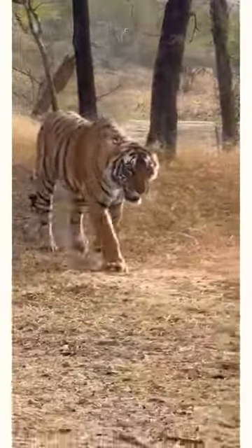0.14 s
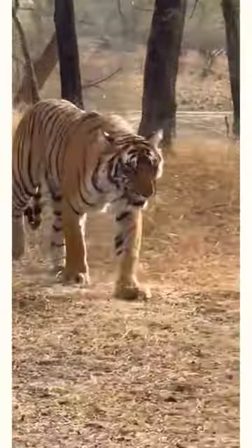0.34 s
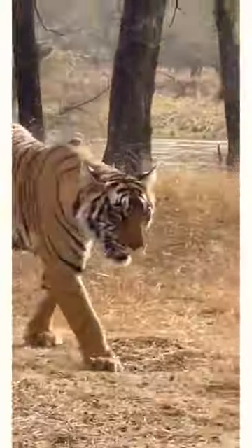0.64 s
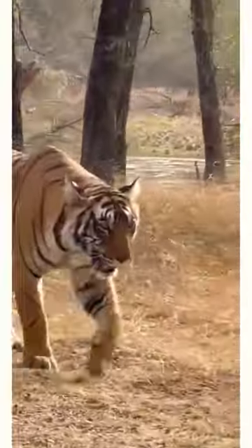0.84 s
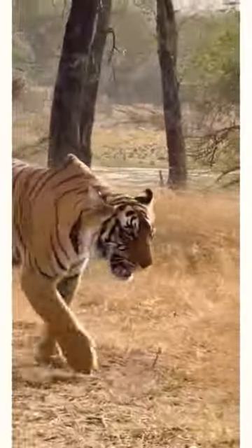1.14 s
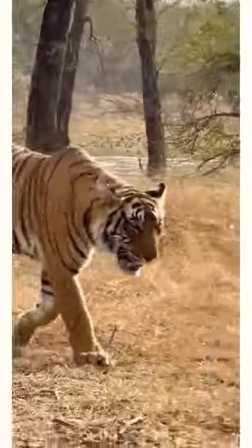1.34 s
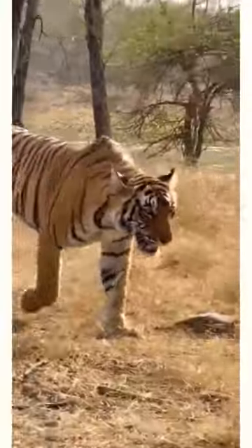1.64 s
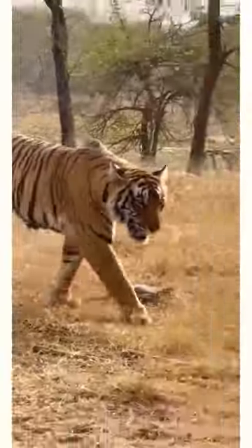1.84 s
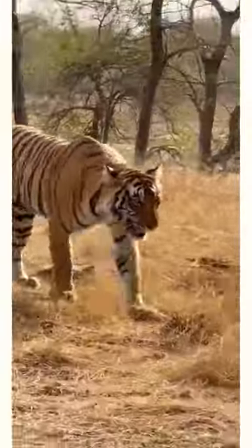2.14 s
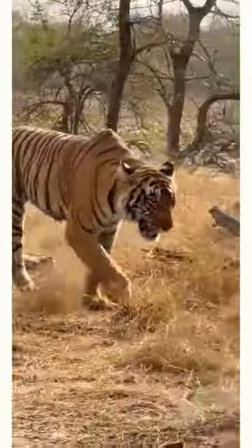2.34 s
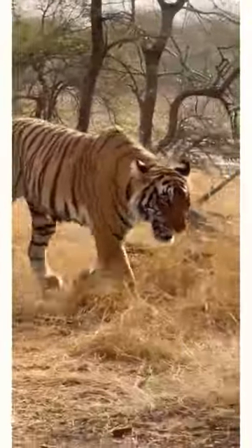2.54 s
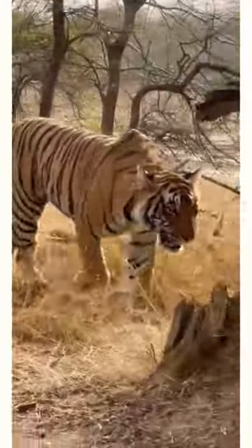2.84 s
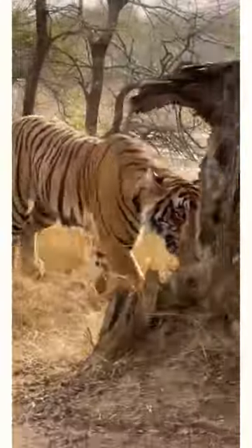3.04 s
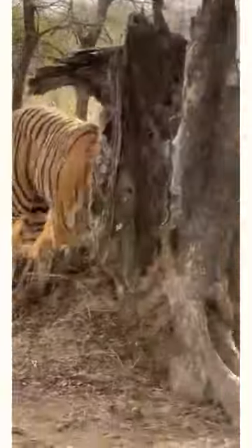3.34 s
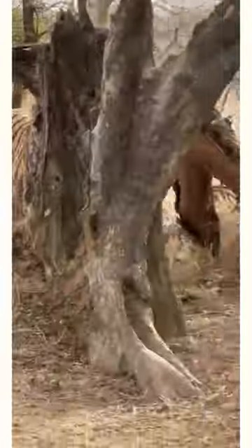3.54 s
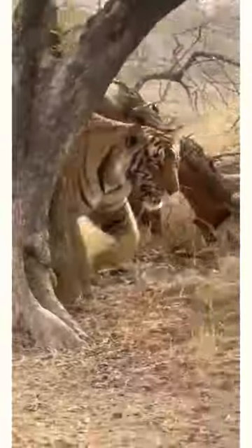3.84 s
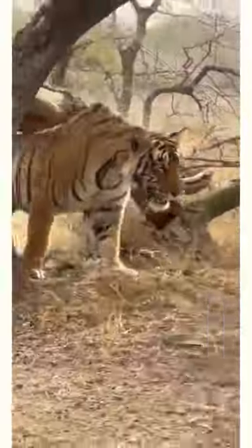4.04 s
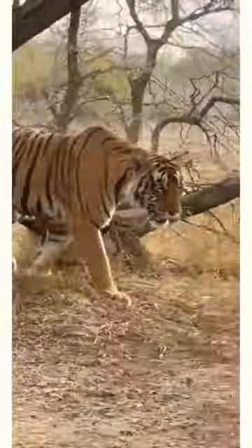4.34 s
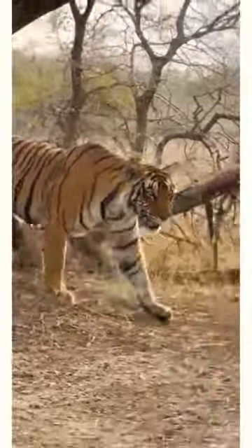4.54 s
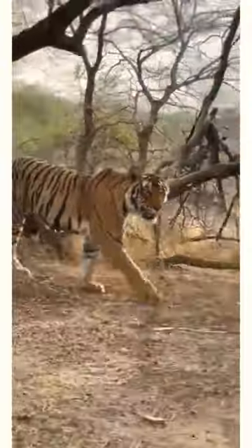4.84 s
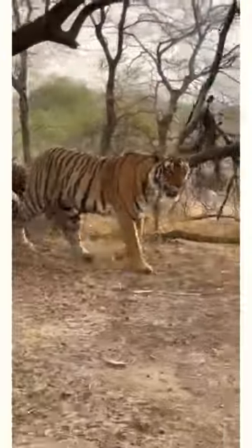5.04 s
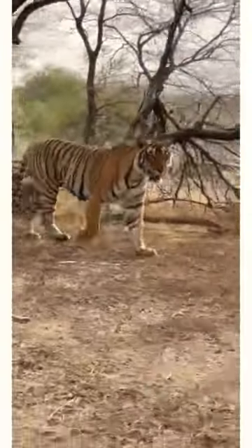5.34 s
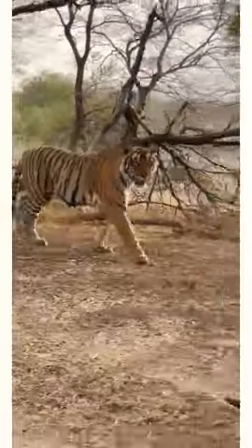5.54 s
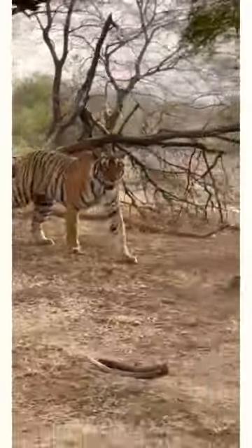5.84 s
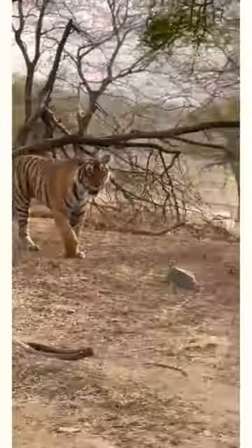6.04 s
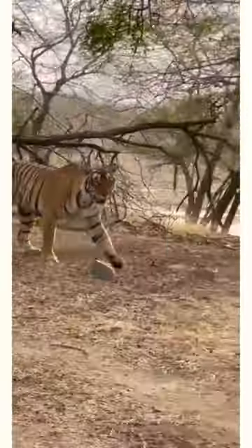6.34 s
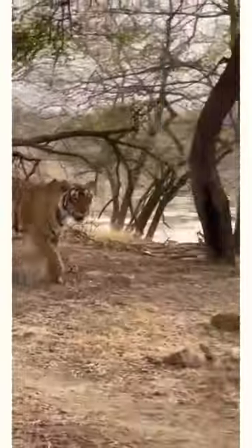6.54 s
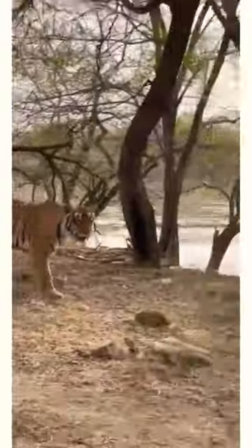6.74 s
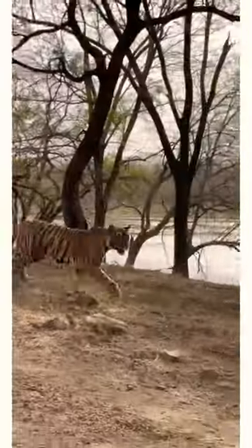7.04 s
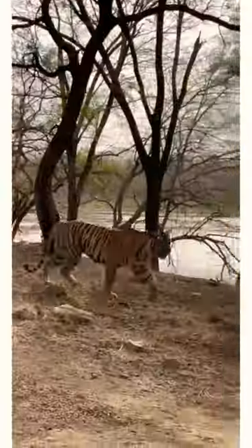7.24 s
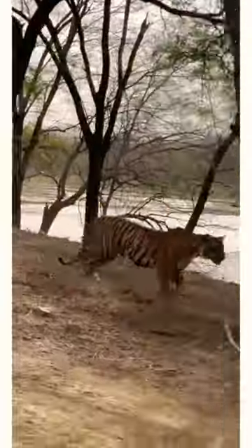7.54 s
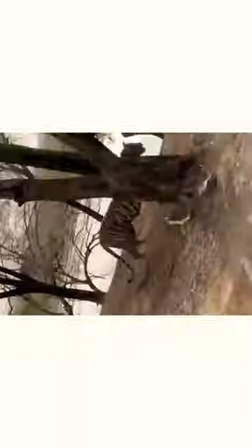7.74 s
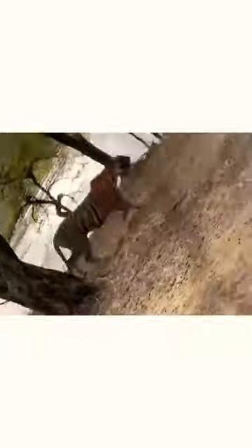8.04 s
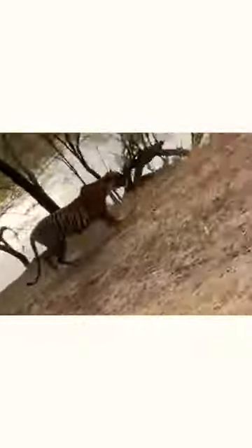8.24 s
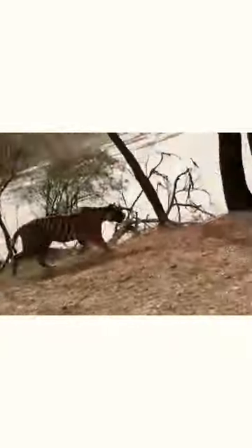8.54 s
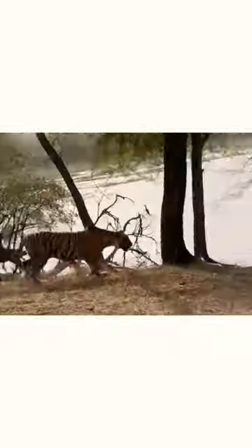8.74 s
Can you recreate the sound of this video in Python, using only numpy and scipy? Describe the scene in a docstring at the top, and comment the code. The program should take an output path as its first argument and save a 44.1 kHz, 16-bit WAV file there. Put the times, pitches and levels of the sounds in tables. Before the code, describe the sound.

Loud arching bird yelps with clipped whistles, then harsh honks over faint coos, two pure hoots, thin ticks and a fast trill in open woodland.

```python
"""Among trees by a lake, birds call loudly: arching yelps with clipped whistles between them,
then faint far coos under a run of harsh honks and two pure hoots, then thin ticks that break into
a fast trill over more yelps. Voices are buzzing harmonics with breath noise, or nearly pure gliding tones.
Trunks and ground throw the calls back as echoes and diffuse tails, and the loudest ones overload the
recorder. Shaped noise makes the outdoor air, in three stretches of differing colour with short gaps."""
import sys
import numpy as np
from scipy import signal
from scipy.fft import rfft, irfft
from scipy.io import wavfile
from scipy.ndimage import uniform_filter1d

SR = 44100
rng = np.random.default_rng(int(sys.argv[2]) if len(sys.argv) > 2 else 0)


def wav_out(sig):
    """Save sig, one row per channel (or a flat mono array), as 16-bit PCM at SR to the path in sys.argv[1]."""
    wavfile.write(sys.argv[1], SR, np.round(np.clip(np.atleast_2d(sig).T, -1, 1) * 32767).astype(np.int16))


N = 391608
TIME = np.arange(N) / SR  # seconds


def amp(db):
    """Amplitude factor of a level in dB."""
    return 10 ** (np.asarray(db) / 20)


def unit(x):
    """The sound scaled to rms 1."""
    return x / np.sqrt(np.mean(x ** 2) + 1e-20)


def read(points, hz):
    """A spectrum in dB, joined by straight lines over log frequency."""
    point_hz, db = np.transpose(points)
    return np.interp(np.log(hz + 1), np.log(point_hz + 1), db)


def add(mix, start_s, sound):
    """Lays a sound into the mix from its start time, cut off at the end of the mix."""
    part = mix[max(round(start_s * SR), 0):][:len(sound)]
    part += sound[:len(part)]


def lowpass(x, hz):
    """Steep treble cut without delay."""
    taps = signal.firwin(401, min(hz, .49 * SR), window=("kaiser", 8), fs=SR)
    return signal.oaconvolve(x, taps, "same")


def highpass(x, hz):
    """Third-order bass cut."""
    return signal.sosfilt(signal.butter(3, hz, "high", fs=SR, output="sos"), x)


def wander(size, hz):
    """Smooth random drift of about rms 1, with most of its movement slower than hz."""
    drawn = size + SR  # a spare second, so that short calls do not wrap round
    f = np.fft.rfftfreq(drawn, 1 / SR)
    spectrum = rfft(rng.standard_normal(drawn)) * np.exp(-(f / hz) ** 2)
    return unit(irfft(spectrum))[:size]


def coloured(spectrum):
    """Noise of rms 1 with the given spectrum."""
    gain = amp(read(spectrum, np.fft.rfftfreq(N, 1 / SR)))
    return unit(irfft(rfft(rng.standard_normal(N)) * gain, N))


def during(start_s, end_s):
    """1 between two times, with short fades inside them."""
    return np.clip(np.minimum(TIME - start_s, end_s - TIME) / 0.034, 0, 1)


def echoes(x, reflections):
    """The sound with a few single reflections from nearby surfaces."""
    out = x.copy()
    for delay_s, level_db in reflections:
        add(out, delay_s, amp(level_db) * x)
    return out


def scatter(x, t60, wet_db):
    """Diffuse tail from many twigs and trunks: sparse random reflections that lose 60 dB in t60 seconds."""
    t = TIME[:SR]
    sparse = rng.standard_normal(SR) * (rng.random(SR) < .05)
    taps = sparse * amp(-60 * t / t60) * (t > .004)
    return amp(wet_db) * signal.oaconvolve(x, taps / np.linalg.norm(taps))[:N]


def overload(x, ceiling, hardness):
    """Rounds off the crests, which adds odd harmonics."""
    return x / (1 + abs(x / ceiling) ** hardness) ** (1 / hardness)


def grit(x, db, low_hz):
    """Hiss that follows the power of a sound, so it rides on the loudest moments."""
    power = uniform_filter1d(x ** 2, size=90)
    return amp(db) * power * highpass(rng.standard_normal(N), low_hz)


def progress(length_s):
    """Runs from 0 to 1 over a call."""
    return np.linspace(0, 1, int(length_s * SR))


def swell(u, attack, release, ends_db, bend):
    """Amplitude with attack, hold and release; the first and last are shares of the call."""
    before = 1 - u / attack
    after = 1 - (1 - u) / max(release, .01)
    away = np.clip(np.maximum(before, after), 0, 1)
    return amp(-ends_db * away ** bend) * signal.windows.tukey(len(u), .06)


def arch(u, first_hz, top_hz, last_hz, top, rise_bend, fall_bend):
    """Pitch that climbs to a top and falls away, with how far it has risen and fallen (0-1)."""
    rise = np.sin(np.pi / 2 * np.clip(u / top, 0, 1)) ** rise_bend
    fall = np.clip((u - top) / (1 - top), 0, 1) ** fall_bend
    hz = first_hz + (top_hz - first_hz) * rise + (last_hz - top_hz) * fall
    return hz, rise, fall


def note(length_s, first_hz, knee_hz, last_hz, knee, crest):
    """Pitch and amplitude of a whistled note: two glides joined at a rounded knee, one crest, faded ends."""
    u = progress(length_s)
    hz = np.interp(u, [0, min(knee, 1), 1], [first_hz, knee_hz, last_hz])
    rounded_hz = uniform_filter1d(hz, size=int(.34 * len(u)) + 1)
    return rounded_hz, swell(u, crest, 1 - crest, ends_db=17, bend=2.19)


def sing(notes, calls):
    """Start, pitch and amplitude of every note of a repeated call."""
    for start_s, level_db, pitch, stretch in calls:
        for delay_s, length_s, note_db, *shape in notes:
            hz, level = note(length_s * stretch, *shape)
            yield start_s + delay_s * stretch, hz * pitch, amp(level_db + note_db) * level


def whistle(hz, level, jitter, second_db):
    """A nearly pure tone with a slightly unsteady pitch and a weak octave."""
    phase = 2 * np.pi * np.cumsum(hz * (1 + jitter * wander(len(hz), 570))) / SR
    return level * (np.sin(phase) + amp(second_db) * np.sin(2 * phase))


def reedy(hz, throat, rough, jitter, bright_db=0):
    """Harmonics and pulsed breath noise of the syrinx, shaped by the throat; about rms 1."""
    def gain(f):
        brightness = bright_db * np.clip((f - 1700) / 1200, 0, 1)
        return amp(read(throat, f) + brightness)
    size = len(hz)
    turns = np.cumsum(hz * (1 + jitter * wander(size, 180))) / SR
    k = np.arange(1, 21)[:, None]  # harmonic numbers
    weights = gain(k * hz)
    lag = (k * hz / 900) ** 2  # the throat delays the high harmonics, which spreads each pulse out
    harmonics = weights * np.cos(2 * np.pi * k * turns - lag)
    voice = harmonics.sum(0) / np.sqrt((weights ** 2).sum(0) / 2)
    puffs = rng.standard_normal(size) * (1 + np.cos(2 * np.pi * turns))  # one puff a cycle
    breath = unit(irfft(rfft(puffs) * gain(np.fft.rfftfreq(size, 1 / SR)), size))
    return (voice + rough * breath) / np.sqrt(1 + rough ** 2)


def air(spectrum, db, start_s, end_s, edge_hz, swell_db):
    """Outdoor hiss or rumble: shaped noise whose level wanders by swell_db rms."""
    level = amp(db + swell_db * wander(N, 6))
    return level * lowpass(coloured(spectrum), edge_hz) * during(start_s, end_s)


def outdoor_air():
    """The open air by the lake: broad noise in three stretches, with rumble under the first and third."""
    # Relative noise spectra behind the yelps, the honks and the trill, and of the rumble: hz, level_db
    behind_yelps = [(15, -39.5), (25, -17), (142, -17.5), (177, -14), (310, -21.5), (458, -14), (1050, -10),
                    (1310, -10.5), (1840, -12.5), (2790, -14), (3240, -24), (8600, -37), (11200, -68.5),
                    (18900, -120)]
    behind_honks = [(15, -49), (25, -22), (32, -14), (63, 4.5), (150, -3), (231, -9.5), (377, -10),
                    (629, -14), (711, -12), (804, -14), (1590, -13), (1760, -15.5), (4340, -16),
                    (8600, -21.5), (11200, -50), (18900, -120)]
    behind_trill = [(15, -54), (25, -13), (453, -25), (640, -10), (844, -13.5), (1090, -16.5), (1160, -16),
                    (2270, -23), (3680, -17), (6100, -22.5), (7930, -40), (13400, -120)]
    low_rumble = [(18, 4.5), (30, 3), (62, -6.5), (90, -15.5), (150, -19), (400, -49.5)]
    third = air(behind_trill, -54, 7.5, 8.92, edge_hz=6080, swell_db=2.5)
    return (air(behind_yelps, -48.5, -.03, 3.48, edge_hz=8600, swell_db=1.5)
            + air(low_rumble, -51.5, -.025, 3.5, edge_hz=900, swell_db=.5)
            + air(behind_honks, -47, 3.55, 7.28, edge_hz=8600, swell_db=.5)
            + highpass(third, 100)
            + air(low_rumble, -58, 8.12, 8.92, edge_hz=900, swell_db=6.5))


def yelps():
    """Arching calls whose second harmonic sits on the throat resonance; raspy at both ends, quavering as they fall."""
    # Calls: start_s, level_db, pitch_factor, length_factor, held_db (how far the call starts held back)
    yelp_calls = [(.094, 3, 0.99, 1.002, 2.5), (.699, 3.5, 0.99, 1.032, 3.5), (1.273, 2, .995, .95, 2.5),
                  (2.582, 3, 1, 1.05, 8.5), (3.199, -1, 1, 1, 2), (8.141, 6.5, .99, 1.012, 14),
                  (8.746, 2.5, 0.99, 1.045, 2.5)]
    # Throat resonances: hz, level_db
    yelp_throat = [(450, -32.5), (700, -26.5), (950, -22.5), (1150, -2.5), (1380, -0.5), (1650, -11),
                   (2050, -22), (2800, -41), (3500, -36.5), (4300, -47)]
    # Reflections from ground and trunks: delay_s, level_db
    reflections = [(0.058, -13.5), (0.075, -17.5), (0.093, -22.5), (0.106, -37)]
    out = np.zeros(N)
    for start_s, level_db, pitch, stretch, held_db in yelp_calls:
        u = progress(.185 * stretch)  # seconds
        # Pitches before the call's own pitch factor
        hz, _, _ = arch(u, first_hz=563, top_hz=700.5, last_hz=450.7, top=.37, rise_bend=2.6, fall_bend=1.35)
        level = swell(u, attack=.27, release=.48, ends_db=22.5, bend=1.14)
        t = TIME[:len(hz)]
        quaver = 1 + .025 * np.sin(2 * np.pi * 52 * t) * np.clip(t / .12, 0, 1) ** 2  # 52 Hz, growing
        rough = .06 + .9 * np.clip(1 - level / .8, 0, 1)  # breathier where the call is weak
        effort = amp(level_db - held_db * np.clip(1 - (u / .62) ** 3, 0, 1))
        voice = reedy(hz * pitch * quaver, yelp_throat, rough, jitter=.004 + .03 * rough)
        add(out, start_s, effort * level * voice / np.sqrt(2))
    wet = echoes(out, reflections)
    wet = wet + scatter(out, t60=.16, wet_db=-17.5) + scatter(out, t60=1.2, wet_db=-25.5)
    wet = overload(highpass(wet, 320), ceiling=.9, hardness=7)
    heard = during(-1, 3.46) + during(7.5, 10)  # the tails stop with these stretches
    return lowpass(wet + grit(wet, db=-44, low_hz=1500), 4400) * heard


def whistles():
    """Short clipped notes, gliding and nearly pure: down-slurs, pips, two-part calls and single whistles."""
    # Notes of each call: delay_s, length_s, level_db, first_hz, knee_hz, last_hz, knee_share, crest_share
    slur_notes = [(-.008, 0.03, -24.5, 3435, 3434, 3154, 0.4, 0.8),
                  (.007, .054, -5.5, 3362, 2430, 2428, .58, 0.31)]
    pip_notes = [(0.0054, 0.037, -6.5, 1600, 2680, 1100, .55, .6)]
    two_part_notes = [(0, .042, -9, 1544, 1947, 1495, .62, 0.6),
                      (.048, .048, -3, 1439, 2584, 2531, .62, 0.64)]
    # When each is sung: start_s, level_db, pitch_factor, length_factor
    slur_calls = [(.253, 1, 0.99, 1), (0.6, 1.5, .97, 1)]
    pip_calls = [(0.923, -2.5, 1.017, 1.16), (1.013, 1, 0.99, 0.83), (1.098, -0.5, .98, .92)]
    two_part_calls = [(2.501, -2.5, 0.98, 0.96), (2.657, -0.5, 0.97, 0.96), (2.81, -2, 0.97, 0.99),
                      (2.964, -1.5, 0.95, 1)]
    # Single whistles: start_s, length_s, level_db, first_hz, knee_hz, last_hz, knee_share, crest_share
    single_whistles = [(1.207, 0.066, -16.5, 2360, 3796, 3720, 0.7, .52),
                       (1.234, .04, -21, 2810, 3395, 3757, .5, 0.6),
                       (1.555, 0.14, -33, 2680, 2573, 2616, 0.34, 0.62),
                       (1.698, 0.058, -25.5, 2620, 3000, 3680, 0.67, 0.36),
                       (1.875, .028, -24.5, 1450, 2097, 1500, 0.48, 0.16),
                       (1.915, 0.018, -22, 2150, 1800, 1615, 0.2, 0.1),
                       (2.019, 0.042, -35.5, 3740, 3540, 3420, 0.8, .45),
                       (2.062, 0.069, -1, 3050, 2472, 1743, .5, 0.5),
                       (2.399, .045, -41.5, 1906, 3134, 3950, 0.5, 0.6),
                       (3.155, 0.093, -12, 3950, 3394, 3196, 0.26, 0.37),
                       (7.675, 0.043, -49, 3430, 3126, 3074, 0.42, 0.54),
                       (7.862, 0.025, -40.5, 5800, 5900, 5980, 0.6, .45),
                       (8.058, 0.031, -35.5, 5280, 5390, 5260, 0.8, .55)]
    # Close reflections: delay_s, level_db
    reflections = [(.0085, -7.5), (0.015, -14), (.023, -14), (.041, -24)]
    out = np.zeros(N)
    repeated = (slur_notes, slur_calls), (pip_notes, pip_calls), (two_part_notes, two_part_calls)
    for notes, calls in repeated:
        for start_s, hz, level in sing(notes, calls):
            add(out, start_s, whistle(hz, level, jitter=.023, second_db=-54))
    for start_s, length_s, level_db, *shape in single_whistles:
        hz, level = note(length_s, *shape)
        add(out, start_s, amp(level_db) * whistle(hz, level, jitter=.018, second_db=-39.5))
    wet = echoes(out, reflections)
    wet = wet + scatter(out, t60=.15, wet_db=-12) + scatter(out, t60=.7, wet_db=-27)
    wet = overload(wet, ceiling=1, hardness=3.5)
    return lowpass(wet + grit(wet, db=-21.5, low_hz=1500), 8600)


def scuffs():
    """Soft scuffs between the honks: brief dull swells of noise."""
    # Swells: start_s, length_s, level_db
    scuff_swells = [(3.583, 0.032, -38), (4.07, 0.07, -38.5), (4.785, 0.12, -36.5), (5.479, 0.074, -40.5),
                    (5.946, 0.07, -39), (6.831, 0.038, -40)]
    # Relative noise spectrum: hz, level_db
    scuff_spectrum = [(60, -2), (250, -4.5), (450, -12.5), (750, -5), (1100, -18), (1700, -19.5),
                      (3000, -22.5), (8000, -28.5)]
    level = np.zeros(N)
    for start_s, length_s, level_db in scuff_swells:
        add(level, start_s, amp(level_db) * np.hanning(int(length_s * SR)))
    return level * lowpass(coloured(scuff_spectrum), 6100)


def honks():
    """Harsh honks: a sudden rough start, a pitch arch, then a fall that dulls and tapers off."""
    # Calls: start_s, length_s, first_hz, top_hz, last_hz, top_share (of the length, where the top comes),
    # rise_exponent (higher is later), level_db, roughness (0-1), brightness_db, beak_factor (on the throat)
    honk_calls = [(3.615, .15, 518, 802.5, 421, 0.46, 3.46, -13.5, 0.22, -3, 1.17),
                  (4.093, 0.017, 498, 519, 477, .7, 1.4, -29.5, .85, 0, 1.2),
                  (4.133, .09, 525, 712, 458, 0.59, 4.14, -15.5, 0.31, 3, 1.036),
                  (4.469, 0.11, 482.5, 661, 376, 0.55, 2.7, -15.5, 0.29, 3.5, 1.05),
                  (5.076, 0.096, 470.6, 550.4, 388, 0.56, 1.7, -13, .13, -1, 0.99),
                  (5.569, 0.11, 408, 482.7, 286, 0.3, 1.64, -16, 0.24, 4.5, 1.046),
                  (6.034, 0.088, 380.5, 412.7, 305, 0.48, 1.2, -12.5, 0.16, -9, 0.88),
                  (6.43, 0.1, 409, 462.5, 278, .38, 1.3, -14, 0.13, -4, .97),
                  (6.95, .11, 419.7, 468, 285.3, 0.37, 1.54, -15.5, 0.37, -1.5, 0.98)]
    # Throat resonances before the beak factor: hz, level_db
    honk_throat = [(120, -34.5), (300, -2.5), (450, -12), (750, -7), (1100, 1), (1400, -6), (1650, -7),
                   (2100, -23), (2700, -21.5), (3300, -10), (3800, -23), (4500, -23.5), (6000, -34.5),
                   (8500, -56)]
    out = np.zeros(N)
    for start_s, length_s, first_hz, top_hz, last_hz, top, late, level_db, rough, bright_db, beak in honk_calls:
        u = progress(length_s)
        hz, rise, fall = arch(u, first_hz, top_hz, last_hz, top, rise_bend=late, fall_bend=1.6)
        attack = np.clip(u * length_s / .011, 0, 1) ** 1.5  # 11 ms
        taper_db = -26 * np.clip((u - .66) / .44, 0, 1) ** 1.02
        level = attack * amp(taper_db + 2.1 * wander(len(u), 81))
        rasp = rough * (.18 + .92 * (1 - rise) + fall)
        # Strong and weak pulses alternate, most where the call is raspy
        doubling = 1 + .29 * rasp * np.cos(np.pi * np.cumsum(hz) / SR)
        # A wider beak raises the low resonances
        throat = [(f * beak if f < 2500 else f, throat_db) for f, throat_db in honk_throat]
        voice = reedy(hz, throat, rasp, jitter=.12 * rasp, bright_db=bright_db)
        body = lowpass(voice, 1800)
        treble_gain = amp(-12 * fall + 2.5 * wander(len(u), 60))  # dulls by 12 dB and flutters
        add(out, start_s, amp(level_db) * level * doubling * (body + treble_gain * (voice - body)))
    wet = out + scatter(out, t60=.14, wet_db=-10) + scatter(out, t60=.51, wet_db=-26.5)
    return lowpass(overload(wet, ceiling=.38, hardness=4), 8600)


def coos():
    """Faint low coos from far off: gliding tones with an octave, in a strong diffuse tail."""
    # Calls: start_s, length_s, level_db, first_hz, last_hz
    coo_calls = [(3.834, 0.061, -36, 383, 377), (3.906, 0.31, -42.5, 244.6, 223),
                 (4.494, 0.48, -45.5, 252.7, 217.5), (4.949, .06, -35, 406, 331),
                 (4.984, 0.074, -37.5, 268, 213), (5.331, 0.086, -41.5, 286, 249),
                 (6.876, 0.09, -32.5, 230.6, 288)]
    far = np.zeros(N)
    for start_s, length_s, level_db, first_hz, last_hz in coo_calls:
        u = progress(length_s)
        level = amp(level_db) * swell(u, attack=.83, release=.4, ends_db=16, bend=2.2)
        hz = first_hz + (last_hz - first_hz) * u
        add(far, start_s, whistle(hz, level, jitter=.047, second_db=-13))
    return far + scatter(far, t60=.47, wet_db=-7)


def hoots():
    """Two loud, nearly pure hoots that sag a little, the second lower; overtones grow with their level."""
    # Calls: start_s, length_s, level_db, pitch_hz (halfway), attack_share (of the length)
    hoot_calls = [(6.96, 0.087, 2.5, 1076, 0.64), (7.115, 0.14, 3, 905, .25)]
    # Faint overtones at full swell: pitch_multiple, level_db
    hoot_overtones = [(3, -30), (4, -38.5), (6, -39.5), (7, -33)]
    sag_hz_per_s = 190
    near = np.zeros(N)
    for start_s, length_s, level_db, pitch_hz, attack in hoot_calls:
        u = progress(length_s)
        shape = swell(u, attack, release=.35, ends_db=19, bend=1.63)
        hz = pitch_hz - sag_hz_per_s * length_s * (u - .5)
        phase = 2 * np.pi * np.cumsum(hz * (1 + .0074 * wander(len(u), 400))) / SR
        overtones = sum(amp(over_db) * np.sin(k * phase) for k, over_db in hoot_overtones)
        add(near, start_s, amp(level_db) * shape * (np.sin(phase) + shape ** 2 * overtones))
    near = overload(near + scatter(near, t60=.14, wet_db=-15), ceiling=.91, hardness=10)
    return lowpass(near + grit(near, db=-25, low_hz=2500), 8500)


def trill():
    """A small bird winds up with thin ticks, then repeats flick, buzz, dip and sweep five times a second."""
    # Notes of a tick, and flick, buzz, dip and sweep of the trill:
    # delay_s, length_s, level_db, first_hz, knee_hz, last_hz, knee_share, crest_share
    tick_notes = [(0, .021, 1, 5810, 4380, 3900, .53, 0.38), (.022, 0.027, -7, 5320, 5740, 5610, 0.38, .35)]
    trill_notes = [(0, 0.036, -12, 1800, 4990, 5230, .38, 0.19),
                   (0.029, 0.041, -2, 5840, 4213, 3335, 0.39, .55),
                   (.052, .042, 0.5, 3450, 2980, 3700, .3, .6),
                   (.098, .058, 1, 5150, 4255, 2470, .42, 0.74)]
    # When each is sung: start_s, level_db, pitch_factor, length_factor
    tick_calls = [(7.517, -41.5, 0.9, 0.94), (7.643, -42, 1, 0.81), (7.749, -41, 1, 0.95),
                  (7.846, -30.5, 1, 1), (7.971, -28.5, 1, 0.94), (8.08, -25, 1, 0.82)]
    trill_calls = [(8.168, -17.5, 1.05, 0.95), (8.364, -13, 1.01, 0.88), (8.561, -11, 0.98, 0.85),
                   (8.759, -10, 0.97, 0.82)]
    # Pitch shake of flick, buzz, dip and sweep, each a share of the pitch
    warble_shares = (0.04, 0.14, 0.0058, 0.018)
    # Close reflections from twigs and ground: delay_s, level_db
    reflections = [(.012, -19.5), (.022, -21)]
    warble_hz = 203
    ticks, song = np.zeros(N), np.zeros(N)
    for start_s, hz, level in sing(tick_notes, tick_calls):
        add(ticks, start_s, whistle(hz, level, jitter=.022, second_db=-57))
    for start_s, level_db, pitch, stretch in trill_calls:
        for (delay_s, length_s, note_db, *shape), warble in zip(trill_notes, warble_shares):
            hz, level = note(length_s * stretch, *shape)
            shake = 1 + warble * np.sin(2 * np.pi * warble_hz * TIME[:len(hz)])
            loudness = amp(level_db + note_db) * level
            add(song, start_s + delay_s, whistle(hz * pitch * shake, loudness, jitter=.01, second_db=-64))
    tick_tail = scatter(ticks, t60=.049, wet_db=-9) + scatter(ticks, t60=.28, wet_db=-14.5)
    song_tail = scatter(song, t60=.19, wet_db=-14)
    return lowpass(echoes(ticks + song, reflections) + tick_tail + song_tail, 5700)


def scene():
    """All the birds over the outdoor air, as one channel."""
    birds = yelps() + whistles() + honks() + coos() + hoots() + trill()
    return (outdoor_air() + birds + scuffs())[None]


def record(dry):
    """The recorder: calls that pass full scale are clipped, then the band is limited."""
    return lowpass(np.clip(dry[0], -1, 1), 15700)[None]


dry = scene()
out = record(dry)
wav_out(out)
```